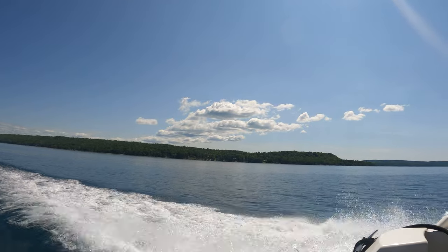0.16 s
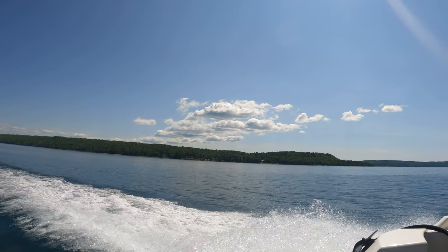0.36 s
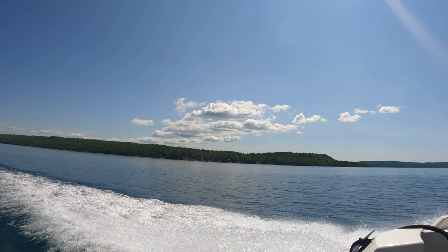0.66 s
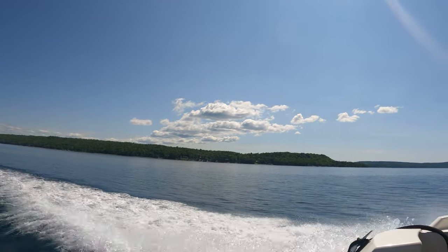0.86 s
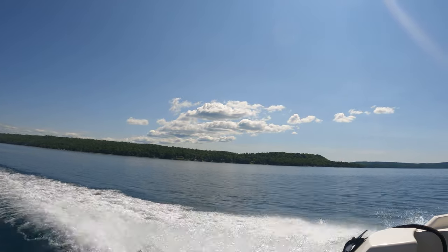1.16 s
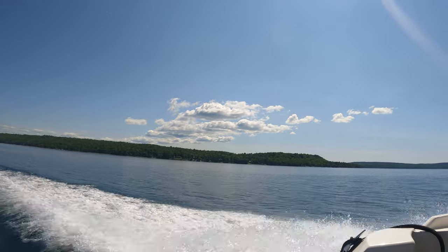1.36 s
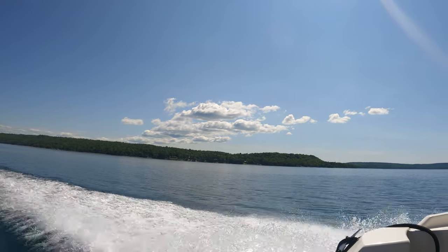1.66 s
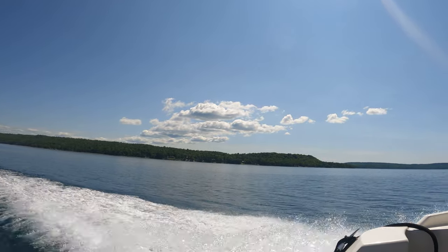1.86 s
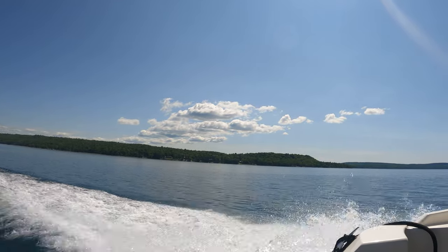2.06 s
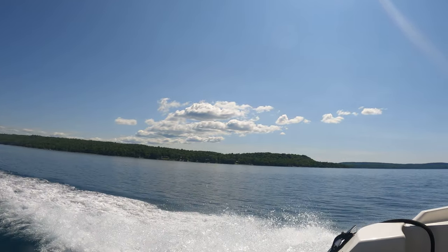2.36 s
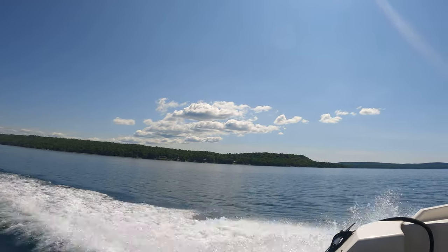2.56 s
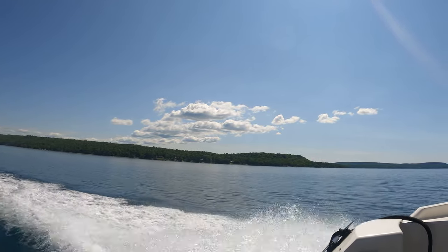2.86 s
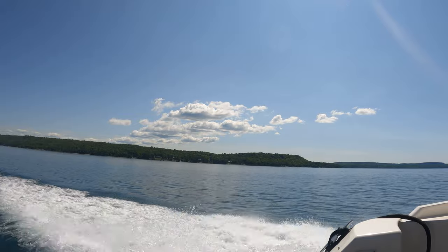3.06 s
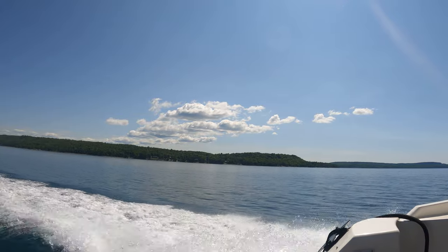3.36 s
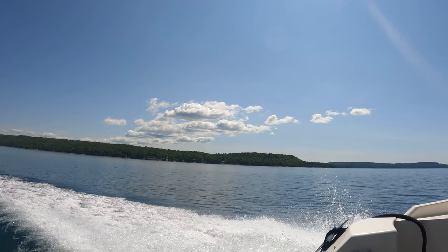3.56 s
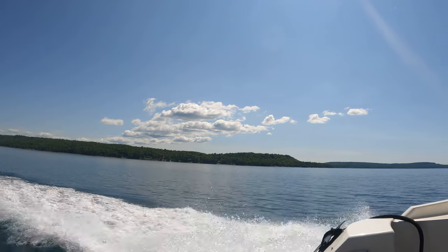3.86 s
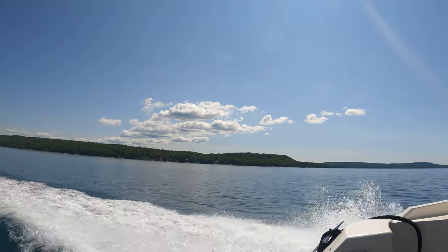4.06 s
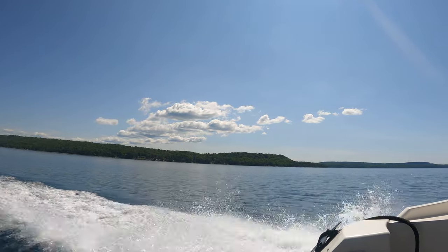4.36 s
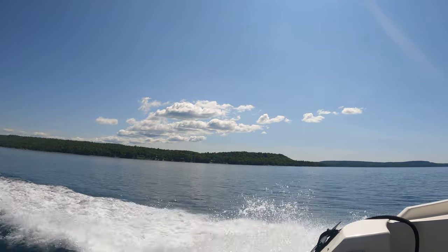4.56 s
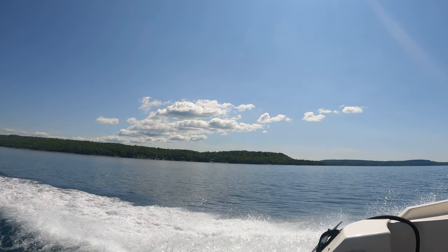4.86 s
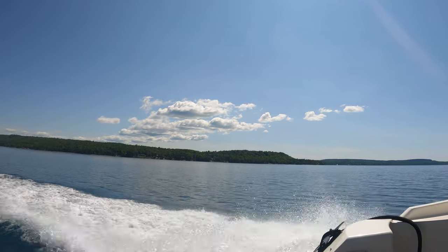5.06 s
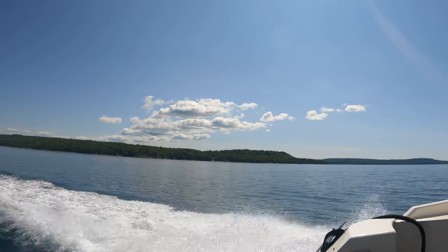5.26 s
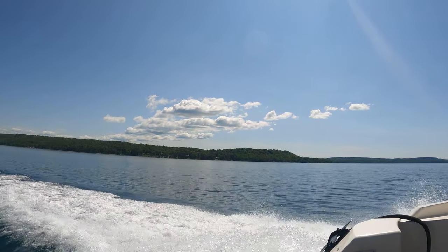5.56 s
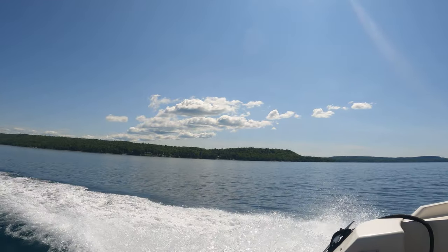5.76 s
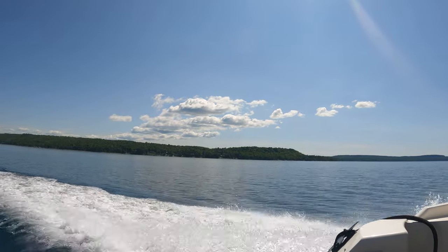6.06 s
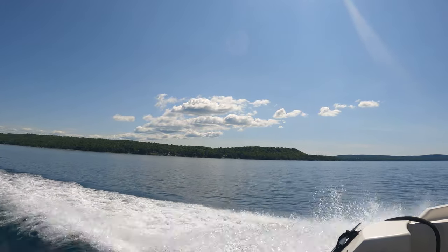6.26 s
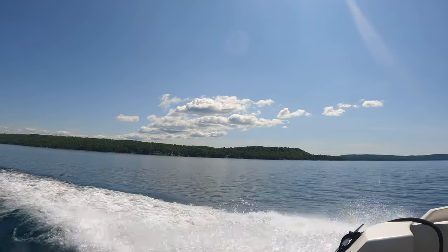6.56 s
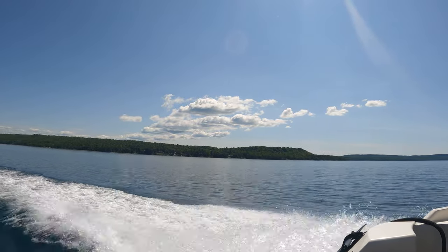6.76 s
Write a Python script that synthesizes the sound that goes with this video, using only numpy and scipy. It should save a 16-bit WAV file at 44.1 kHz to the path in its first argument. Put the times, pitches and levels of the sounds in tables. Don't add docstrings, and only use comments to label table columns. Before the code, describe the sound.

Close mono sound at the stern of a fast motorboat on open water, without echo. Throughout, several nearly matched engines hold constant cruising speed in a deep, slightly rough drone, their low tones slowly beating and swelling. A heavy, nearly steady hull rumble and muffled underwater exhaust churn thicken the bass, which sounds compressed. At 0 seconds the wake is a softer rush behind the engines; it brightens by about 1 second, rises again around 2.3 and is fullest from about 4 to 6.7 seconds, a broad roar with dense hissing, spitting spray. The churn dips lightly near 0.6 and more sharply near 2 seconds, flares faintly at 5.2 and gives a brief burst at 6.5. A very thin, high air hiss stays faint. Spray recedes slightly in the last moments while the engines continue unchanged, without stopping.

```python
import sys
import numpy as np
from scipy import signal
from scipy.fft import rfft, irfft, next_fast_len
from scipy.io import wavfile
from scipy.ndimage import uniform_filter1d, map_coordinates

SR = 44100
rng = np.random.default_rng(int(sys.argv[2]) if len(sys.argv) > 2 else 0)


def elevation(decibels):
    levels = np.asarray(decibels, float)
    return 10 ** (levels / 20)


def wav_record(signal):
    frames = np.transpose(np.atleast_2d(signal))
    bounded = np.clip(frames, -1, 1)
    quanta = np.round(bounded * 32767).astype(np.int16)
    wavfile.write(sys.argv[1], SR, quanta)


N = 304731

# cycle rate in Hz, crank position at the start in cycles.
FIRING_SERIES = [(23.384, -.085), (23.475, .297), (23.5635, 0), (23.606, .062)]
# multiple of the cycle rate, then level in dB of series 1, 2, 3, 4.
LOW_ORDERS = [(1, -34, -70, -41, -70), (2, -40, -46, -70, -31), (3, -46, -60, -70, -49),
              (4, -28, -48, -35, -27), (5, -45, -60, -39, -39), (6, -40, -25, -23, -47),
              (7, -34, -39, -34, -34), (8, -30, -48, -47, -31), (9, -47, -53, -39, -45),
              (10, -53, -66, -44, -34), (11, -42, -32, -39, -49), (12, -50, -42, -38, -43),
              (13, -49, -51, -48, -38), (14, -50, -68, -48, -47)]
# series index, order, level in dB.
PIPE_FAVOURED = [(0, 15, -45), (2, 15, -44), (2, 16, -48), (3, 16, -46), (1, 18, -52), (2, 18, -51),
                 (0, 20, -49), (3, 20, -51), (2, 21, -54), (2, 24, -54), (2, 25, -48)]
HULL_BOOMS = [(0, 4), (3, 4), (1, 6), (2, 6), (0, 8), (3, 8), (2, 4), (3, 2)]
# mean in dB, swing in dB, period in seconds,
# lag in periods.
HULL_SWELLS = [(2.5, 2, 3.7, .05), (1, 1.7, 7.5, 0.28), (-1.2, 1.2, 4.3, 0.38), (1.63, 0.6, 7.3, 0.59),
               (2.4, 2, 8.5, 0.046), (1.6, 4, 7.9, 0.92), (-3, 2, 7.6, .15), (2, 1.5, 6.6, .55)]
OPPOSED_ORDERS = [(2, 4), (0, 6), (0, 9), (1, 9), (1, 12), (1, 2), (2, 2)]
# time in seconds, spray level in dB.
MIC_SWING = [(0, -39.5), (.6, -37), (1.1, -34.5), (1.95, -34.5), (2.3, -31.5), (4.2, -30), (5.1, -29),
             (5.6, -30), (6.1, -29), (6.7, -29), (6.91, -34)]
# time in seconds, change in dB,
# length in seconds.
STERN_SLAPS = [
    (.6, -2, 0.24),
    (1.96, -5, .12),
    (5.223, 1, .05),
    (6.49, 4.5, 0.047),
]
# frequency in Hz, level in dB per Hz.
RUMBLE_SPECTRUM = [(8, -36), (20, 5), (31, 2), (60, 7.5), (110, 9), (170, 7), (230, -4), (330, -54),
                   (900, -120)]
# frequency in Hz, level in dB per Hz.
CHURN_SPECTRUM = [(30, -120), (120, -16.5), (200, -2), (260, -6), (380, -9), (430, -15), (500, -18),
                  (800, -88), (3000, -120)]
# frequency in Hz, level in dB per Hz.
ROAR_SPECTRUM = [(40, -120), (200, -7), (400, -5), (600, 1.5), (900, -3.5), (1300, -10), (1800, -10),
                 (2500, -68.5), (8000, -120)]
# frequency in Hz, level in dB per Hz.
SPRAY_SPECTRUM = [(200, -120), (800, -17.5), (1200, -2), (1450, -6), (1970, 0), (2230, -5), (2700, -5.5),
                  (3770, -4), (4340, -8.5), (5600, -10), (8200, -19), (10000, -25), (11000, -25.5),
                  (11400, -36), (13000, -120)]
# frequency in Hz, level in dB per Hz.
TOP_HISS_SPECTRUM = [(9000, -120), (10800, -40), (11300, -11), (11600, -8), (12100, -2), (12700, -3),
                     (13300, -6), (14000, -10), (14600, -18), (15700, -14), (15900, -61)]

LAST_ORDER = 27


def unit(x):
    return x / np.sqrt(np.mean(x ** 2) + 1e-20)


def wobble(rate, length=N):
    knots = N * rate / SR
    return map_coordinates(rng.standard_normal(int(knots) + 4), [np.linspace(0, knots, length)])


def swing():
    seconds, level_db = np.transpose(MIC_SWING)
    spray_db = np.interp(np.arange(N) / SR, seconds, level_db)
    return spray_db, spray_db - spray_db.mean()


def order_levels():
    first_db, fade_db = -55, .7
    first = len(LOW_ORDERS) + 1
    high = []
    for order in range(first, LAST_ORDER + 1):
        high.append([order] + [first_db - fade_db * (order - first)] * len(FIRING_SERIES))
    for series, order, level_db in PIPE_FAVOURED:
        high[order - first][series + 1] = level_db
    return list(LOW_ORDERS) + high


def hull_swells(t):
    swells = {}
    for (series, order), (mean_db, swing_db, period, lag) in zip(HULL_BOOMS, HULL_SWELLS):
        swells[series, order] = mean_db + swing_db * np.cos(2 * np.pi * (t / period - lag))
    return swells


def engines(level_db, flutter_db, rasp_db, bright_db, facing):
    step = 16
    t = np.arange(0, N + step, step) / SR
    orders = order_levels()
    path = rng.random(len(orders))
    booms = hull_swells(t)
    opposed = {(series, order) for series, order in OPPOSED_ORDERS}
    slow_turn_db = uniform_filter1d(swing()[1], size=SR)
    tilt_db = bright_db + facing * np.interp(t * SR, np.arange(N), slow_turn_db)
    drone = np.zeros(len(t))
    for series, (rate, start) in enumerate(FIRING_SERIES):
        crank = start + rate * t + .001 * wobble(1.28, len(t))
        for row, delay in zip(orders, path):
            order = round(row[0])
            swell_db = flutter_db * wobble(1.513, len(t))
            if (series, order) in booms:
                swell_db = booms[series, order]
            rasp = rasp_db * np.sqrt(order) * wobble(9, len(t))
            swell_db = swell_db + rasp + tilt_db * order / LAST_ORDER
            flip = ((series, order) in opposed) / 2
            tone = np.cos(2 * np.pi * (order * crank + delay + flip))
            drone += elevation(row[series + 1] + swell_db) * tone
    padded = np.pad(drone, 64, "reflect")
    return elevation(level_db) * signal.resample_poly(padded, step, 1)[64 * step:][:N]


def coloured(x, spectrum):
    m = next_fast_len(N + 8192)
    hz, level_db = np.transpose(spectrum)
    log_hz = np.log(np.fft.rfftfreq(m, 1 / SR) + 1)
    gain = elevation(np.interp(log_hz, np.log(hz + 1), level_db))
    return unit(irfft(rfft(x, m) * gain, m)[:N])


def patchy(depth_db):
    z = signal.stft(rng.standard_normal(N + 512), nperseg=512)[2]
    field = uniform_filter1d(rng.standard_normal(z.shape), size=6, axis=0)
    field = uniform_filter1d(field, size=12, axis=1)
    return signal.istft(z * elevation(depth_db * unit(field)), nperseg=512)[1][:N]


def hull_rumble():
    return elevation(-21 + 0.24 * wobble(4.9)) * coloured(patchy(depth_db=0.7), RUMBLE_SPECTRUM)


def exhaust_churn(turn_db, slap_db):
    level_db = -22.5 + 0.32 * turn_db + slap_db
    return elevation(level_db) * coloured(patchy(depth_db=1.4), CHURN_SPECTRUM)


def wake_roar(turn_db, slap_db, surge):
    level_db = -30.5 + 0.72 * turn_db + 0.36 * slap_db + 0.43 * surge
    return elevation(level_db) * coloured(patchy(depth_db=0.2), ROAR_SPECTRUM)


def droplets(size_db):
    size = np.minimum(rng.exponential(size=N), 4)
    ticks = rng.standard_normal(N) * elevation(size_db * size)
    return unit(ticks * (rng.random(N) < 1 / 10))


def wake_spray(spray_db, surge):
    turn_rate = 2 * FIRING_SERIES[-1][0]
    throb = 1 + .04 * np.cos(2 * np.pi * turn_rate * np.arange(N) / SR)
    fizz = patchy(depth_db=.8) + .35 * droplets(size_db=3)
    return elevation(spray_db + 0.32 * surge) * throb * coloured(fizz, SPRAY_SPECTRUM)


def top_hiss(turn_db, surge):
    level_db = -60.5 + .12 * turn_db + .5 * surge
    return elevation(level_db) * coloured(patchy(depth_db=1.0), TOP_HISS_SPECTRUM)


def water():
    spray_db, turn_db = swing()
    t = np.arange(N) / SR
    slap_db = sum(db * np.exp(-((t - s) / length) ** 2) for s, db, length in STERN_SLAPS)
    surge = wobble(7)
    low = hull_rumble() + exhaust_churn(turn_db, slap_db)
    wake = wake_roar(turn_db, slap_db, surge) + wake_spray(spray_db, surge)
    return low + wake + top_hiss(turn_db, surge)


def scene():
    drone = engines(level_db=3.0, flutter_db=1.4, rasp_db=0.68, bright_db=5, facing=0.56)
    return (drone + water())[None]


def top_cut(x):
    return signal.sosfilt(signal.butter(12, 15750, fs=SR, output="sos"), x)


def record(dry):
    bass = signal.sosfiltfilt(signal.butter(2, 450, fs=SR, output="sos"), dry)
    power = np.abs(uniform_filter1d(bass ** 2, size=1500, axis=1))
    ridden = bass * (power / elevation(-33.0) + 1e-3) ** -.12
    top, hardness = elevation(-2.2), 4
    rounded = ridden / (1 + np.abs(ridden / top) ** hardness) ** (1 / hardness)
    return top_cut(rounded + dry - bass)


dry = scene()
out = record(dry)
wav_record(out)
```